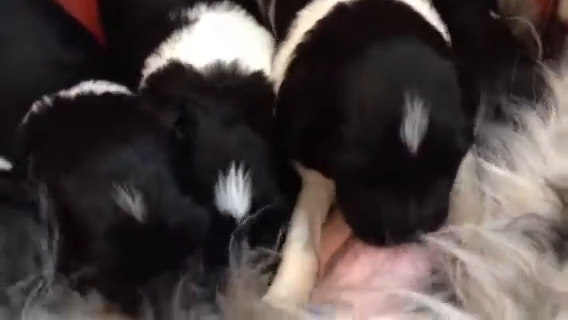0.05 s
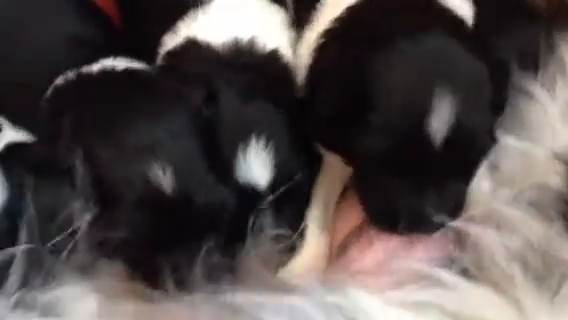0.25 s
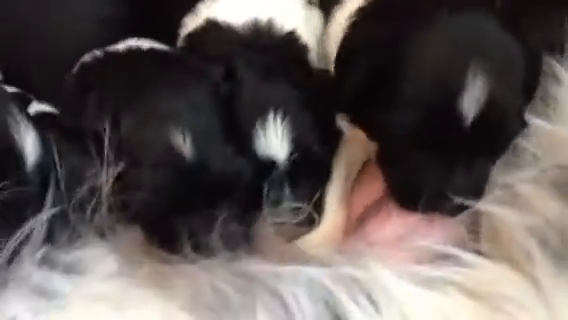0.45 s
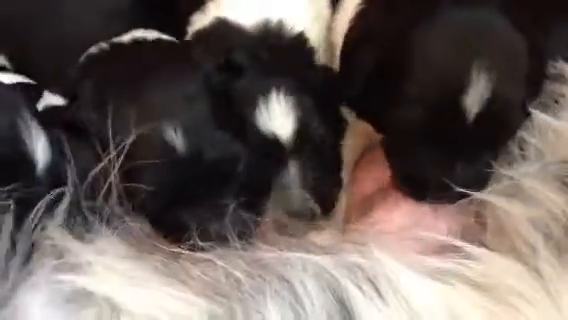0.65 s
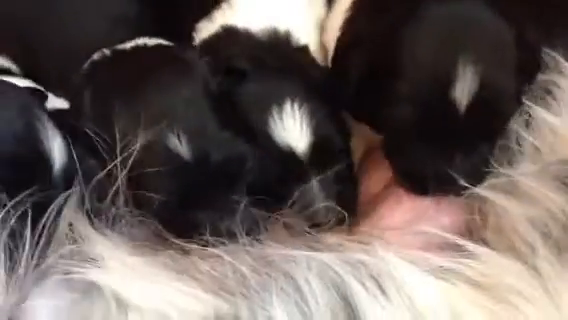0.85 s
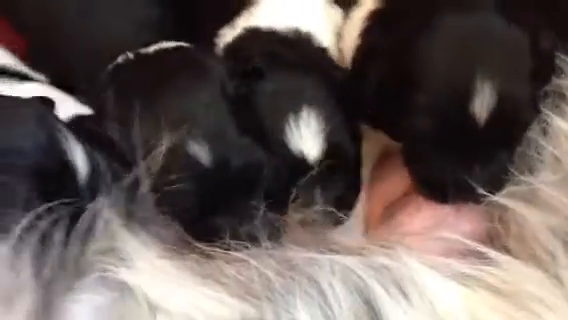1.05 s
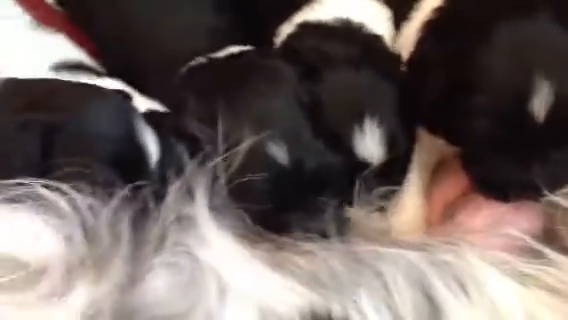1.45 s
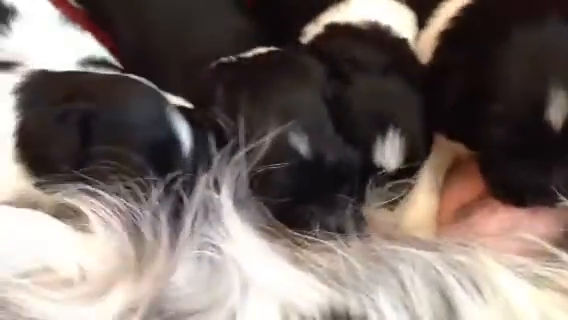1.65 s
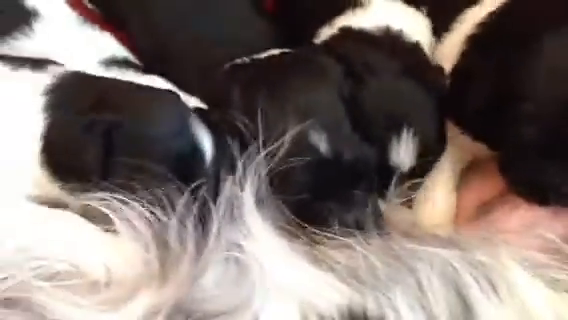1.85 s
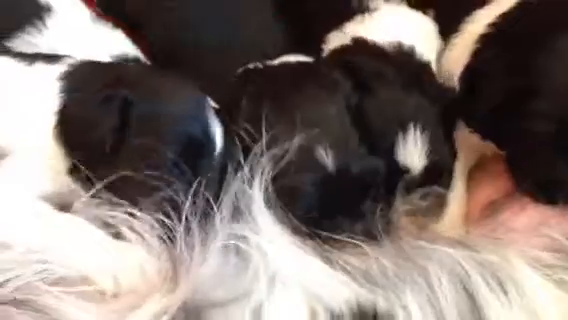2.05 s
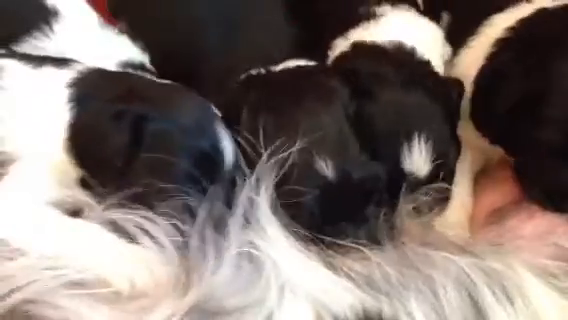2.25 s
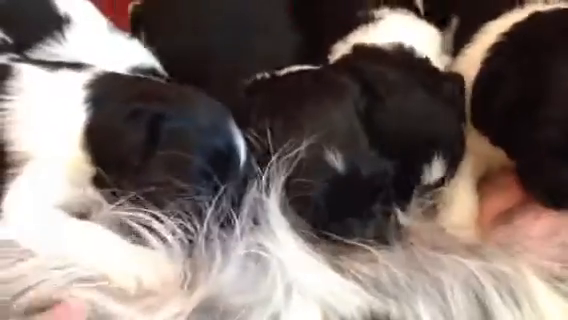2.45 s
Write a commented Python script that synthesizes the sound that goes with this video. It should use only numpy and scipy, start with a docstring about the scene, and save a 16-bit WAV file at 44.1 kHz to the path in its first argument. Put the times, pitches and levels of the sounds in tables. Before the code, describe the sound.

Nursing puppies give a sharp lip smack, then click softly as they nuzzle through fur.

```python
"""A quiet, furnished room, one microphone close to puppies nursing at their mother's belly.
Muzzles and paws push through fur, so hairs slip over each other and skin is rubbed.
One mouth loses its seal with a sharp smack, and a short, bright room reflection follows it.
In between, tongues click as films of milk part, among soft low thuds and a gulp."""
import sys
import numpy as np
from scipy import signal
from scipy.fft import rfft, irfft, next_fast_len
from scipy.io import wavfile
from scipy.ndimage import uniform_filter1d

SR = 44100
rng = np.random.default_rng(int(sys.argv[2]) if len(sys.argv) > 2 else 0)


def generate_wav(sig):
    """Save sig (samples, or channels by samples) to the path in sys.argv[1] as 16-bit PCM at SR."""
    pcm = np.round(np.clip(np.atleast_2d(sig).T, -1, 1) * 32767).astype(np.int16)
    wavfile.write(sys.argv[1], SR, pcm)


N = 110250


def undb(db):
    """Decibels to gain."""
    return 10 ** (np.asarray(db) / 20)


def unit(x):
    """Scale to rms 1."""
    return x / np.sqrt(np.mean(x ** 2) + 1e-20)


def colour(x, points):
    """Filter by a spectrum of (freq_hz, level_db) points."""
    hz, db = np.array(points, float).T
    freqs = np.fft.rfftfreq(len(x), 1 / SR) + 1
    return irfft(rfft(x) * undb(np.interp(np.log(freqs), np.log(hz), db)), len(x))


def add(track, start_s, sound):
    """Mix a sound into a track."""
    i = int(np.clip(start_s * SR, 0, N - 1))
    track[i:i + len(sound)] += sound[:N - i]


def swell(t, length, attack, release):
    """Smooth attack, hold and release."""
    rise = np.sin(np.pi / 2 * np.clip(t / attack, 0, 1))
    return rise * np.sin(np.pi / 2 * np.clip((length - t) / release, 0, 1))


def ring(t, hz, t60):
    """One dying mode."""
    return np.sin(2 * np.pi * hz * t) * np.exp(-np.log(1000) * t / t60)


def grains(per_s, spread_db):
    """Dense tiny impulses of unequal size."""
    impulses = (rng.random(N) < per_s / SR) * np.sign(rng.standard_normal(N))
    return impulses * undb(spread_db * np.minimum(rng.exponential(size=N), 2 * np.pi))


# Spectra of slipping hairs, hair tips and rubbed skin: freq_hz, level_db
HAIR_HISS = [(1200, -15), (2100, -4.5), (3800, 0), (6300, 1), (8000, -5.5), (15000, -36)]
TIP_SIZZLE = [(3500, -50), (6500, -10), (9700, 1), (12000, -4.5), (14000, -1), (16000, -9)]
SKIN_RUB = [(80, -43), (200, -12), (450, -1.5), (700, 0.5), (1200, -3), (1800, 1), (2500, -5.5),
            (4000, -22.5), (9000, -42)]
# Pushes through fur, close to the microphone: start_s, length_s, hiss_db, sizzle_db, rub_db, centre_hz
FUR_PUSHES = [(-.02, 0.082, -65.5, -74, -63.5, 5000), (0.121, 0.17, -67, -62, -72.5, 3280),
              (0.286, 0.15, -66, -70.5, -67, 4340), (0.452, 0.075, -59.5, -60.5, -65, 4000),
              (0.529, 0.098, -59, -59.5, -62, 5440), (0.627, 0.061, -57.5, -60.5, -62, 3670),
              (0.81, 0.069, -58, -60.5, -62.5, 3600), (.9, 0.062, -67.5, -76, -70.5, 5500),
              (0.998, 0.046, -56.5, -60.5, -66.5, 3600), (1.095, 0.063, -64, -63, -74.5, 6460),
              (1.178, 0.045, -58, -63, -63.5, 3760), (1.235, 0.08, -70.5, -70.5, -71.5, 3600),
              (1.347, 0.045, -63, -61, -59.5, 790), (1.393, 0.086, -67.5, -66, -74.5, 2380),
              (1.537, 0.025, -56.5, -58, -50, 1080), (1.555, .018, -53, -55, -57, 6000),
              (1.59, 0.033, -63.5, -64.5, -65, 615), (1.623, 0.073, -63.5, -74, -75, 3800),
              (1.731, 0.037, -62, -62, -59.5, 960), (1.789, 0.11, -64, -61.5, -66, 6300),
              (1.917, 0.051, -56.5, -58, -59, 6040), (2.102, 0.044, -57.5, -61, -62.5, 2340),
              (2.154, 0.18, -66, -66.5, -69, 5650), (2.293, 0.071, -56.5, -57.5, -56, 2750),
              (2.37, 0.076, -66.5, -70, -75.5, 4140)]


def fur():
    """Each push sets hairs slipping over each other and drags a muzzle over the skin."""
    hairs = colour(grains(per_s=14000, spread_db=2.5), HAIR_HISS)
    tips = unit(colour(grains(per_s=14000, spread_db=2.5), TIP_SIZZLE))
    skin = colour(grains(per_s=4000, spread_db=1.5), SKIN_RUB)
    out, t = np.zeros(N), np.arange(N) / SR
    for start, length, hiss_db, sizzle_db, rub_db, centre_hz in FUR_PUSHES:
        span = np.flatnonzero(abs(t - start - length / 2) < .2)
        tuft = (span + rng.integers(N)) % N  # every push meets other hairs
        hiss = undb(hiss_db) * muzzle_gap(hairs[tuft], centre_hz)
        sizzle = undb(sizzle_db) * tips[tuft]
        rub = undb(rub_db) * muzzle_gap(skin[tuft], centre_hz)
        out[span] += push(t[span] - start, length) * (hiss + sizzle + rub)
    return shifting_tufts(out)


def push(t, length, edge_s=0.019, arch_db=2, stir_s=0.013, settle_s=0.034):
    """A push is firmest in its middle; outer hairs stir before it and spring back after it."""
    edges = swell(t + edge_s / 2, length + edge_s, edge_s, edge_s) ** 2
    arch = undb(arch_db * (np.sin(np.pi * np.clip(t / length, 0, 1)) - 1))
    outer_hairs = undb(-8) * np.exp(np.minimum(t, 0) / stir_s - np.maximum(t - length, 0) / settle_s)
    return np.maximum(edges * arch, outer_hairs)


def muzzle_gap(x, centre_hz, lift_db=5, width_octaves=0.33):
    """The gap between muzzle and belly resonates and lifts a broad band of the rustle."""
    size = next_fast_len(len(x))
    octaves = np.log2((np.fft.rfftfreq(size, 1 / SR) + 1) / centre_hz)
    resonance = undb(lift_db * np.exp(-(octaves / width_octaves) ** 2))
    return unit(irfft(rfft(x, size) * resonance, size)[:len(x)])


def wander(per_s):
    """A curve that glides between random values."""
    size = int(SR / per_s)
    steps = np.repeat(rng.standard_normal(256), size)[:N]
    return 0.81 * uniform_filter1d(steps, size)


def shifting_tufts(x, count=22, top_hz=15400):
    """As other tufts are touched, narrow bands each swell and fade a little on their own."""
    band_index = np.interp(np.sqrt(np.fft.rfftfreq(N, 1 / SR)), [0, np.sqrt(top_hz)], [0, count - 1])
    spectrum = rfft(x)
    bands = (irfft(spectrum * np.maximum(1 - abs(band_index - k), 0), N) for k in range(count))
    return sum(band * undb(4 * wander(per_s=26)) for band in bands)


# Modes of the open mouth: pitch_ratio, level_db, t60_s
MOUTH_MODES = [(.85, -14, 0.04), (1, 7, 0.0077), (1.2, -12, 0.017), (1.48, -2.5, 0.0078),
               (2.08, -5, 0.0068), (2.58, -2.5, 0.0074), (4.25, -7, 0.0029)]
# A mouth's seal letting go, close up: start_s, level_db, tilt_db_per_octave, crack_relative_db, pitch_hz
SEAL_SNAPS = [(0.0786, -39, -4.5, -4, 2520), (0.083, -42.5, -6, -13, 2200), (0.2226, -37, -3, -4, 2730),
              (0.2314, -26, -2.5, -1.5, 3020), (0.2374, -14, 1.5, -12, 2525), (0.2401, -32, -17, -19, 2390),
              (0.2418, -25, -8, -27, 2420)]


def smack(rise_s=0.00028, crack_s=0.00098, low_hz=1950):
    """Each snap of the seal cracks and rings the mouth; the narrow lips radiate little of the low ring."""
    out, t = np.zeros(N), np.arange(SR // 20) / SR
    lips = signal.butter(2, low_hz, "high", fs=SR, output="sos")
    rise = (1 - np.exp(-t / rise_s)) ** 2
    for start, level_db, tilt, crack_db, pitch_hz in SEAL_SNAPS:
        modes = sum(undb(mode_db + tilt * max(np.log2(ratio), 0)) * ring(t, ratio * pitch_hz, t60)
                    for ratio, mode_db, t60 in MOUTH_MODES)
        crack = undb(crack_db) * rng.standard_normal(len(t)) * np.exp(-t / crack_s)
        add(out, start, undb(level_db) * (signal.sosfilt(lips, modes * rise) + crack * rise))
    return out


# Spectrum of the room reflection behind the smack: freq_hz, level_db
SMACK_TAIL = [(1500, -12.5), (2100, 1), (2800, 3.5), (4200, -0.5), (6400, -1), (8500, -37)]


def smack_reflections(start_s=.238, level_db=-43.5, t60_s=0.17):
    """A short, bright, grainy room reflection dies away behind the smack."""
    t = np.arange(N) / SR - start_s
    fade = (t > 0) * np.exp(-np.log(1000) * abs(t) / t60_s)
    return undb(level_db) * fade * unit(colour(grains(per_s=4100, spread_db=1.5), SMACK_TAIL))


# Modes of the cavity at the tongue: pitch_ratio, level_db, t60_cycles
TONGUE_MODES = [(1.002, -5.5, 17.4), (1.45, 0.5, 5.9), (2.4, -8, 29)]
# Wet tongue clicks, close up: start_s, level_db, pitch_hz
TONGUE_CLICKS = [(0.0995, -44, 970), (.170, -41, 3180), (0.3463, -41.5, 1230), (.544, -45.5, 870),
                 (0.7905, -36, 1435), (.9908, -35.5, 820), (0.9939, -37, 990), (1.123, -47, 775),
                 (1.178, -41.5, 1040), (1.338, -38, 3600), (1.3775, -42, 700), (1.5232, -37, 4370),
                 (1.5315, -41.5, 1090), (1.5446, -33, 1300), (1.5478, -34.5, 774), (1.5603, -35, 814),
                 (1.799, -48, 1030), (1.923, -43.5, 1160), (2.253, -43.5, 760), (2.293, -39.5, 780),
                 (2.394, -39, 3860)]


def tongues(scatter=.03, wet_db=-12, wet_s=0.0004, band_hz=(410, 8700)):
    """A film of milk parts and rings a cavity too small to radiate bass; lips and fur muffle the top."""
    out, t = np.zeros(N), np.arange(SR // 40) / SR
    band = signal.butter(2, band_hz, "band", fs=SR, output="sos")
    for start, level_db, pitch_hz in TONGUE_CLICKS:
        modes = np.zeros(len(t))
        for ratio, mode_db, cycles in TONGUE_MODES:
            mode_hz = pitch_hz * ratio
            detune = 1 + scatter * rng.standard_normal()
            modes += undb(mode_db) * ring(t, mode_hz * detune, cycles / mode_hz)
        wet = undb(wet_db) * rng.standard_normal(len(t)) * np.exp(-t / wet_s)
        rise = 1 - np.exp(-2 * np.pi * pitch_hz * t)
        add(out, start, signal.sosfilt(band, undb(level_db) * (modes + wet) * rise))
    return out


# Soft low thuds and a gulp from the nursing puppies: start_s, length_s, level_db, pitch_hz
LOW_THUDS = [(.05, 0.033, -72, 111), (0.236, 0.0061, -61, 375), (0.516, 0.034, -64, 277),
             (.558, 0.074, -63.5, 310), (0.773, 0.027, -67, 212), (0.824, 0.035, -57, 341),
             (0.999, 0.062, -71, 240), (1.052, 0.037, -67.5, 270), (1.274, 0.013, -66, 212),
             (1.372, 0.024, -62.5, 390), (1.58, 0.028, -54.5, 250), (1.697, 0.026, -70.5, 146),
             (1.945, 0.031, -62, 407), (2.123, 0.025, -55.5, 176), (2.145, 0.035, -61, 293),
             (2.191, 0.023, -62.5, 270), (2.248, 0.047, -56, 250)]


def low_thuds(attack_s=0.011, relative_width=0.62):
    """Each thud or gulp is a brief swell of one low, well damped body resonance."""
    out, t = np.zeros(N), np.arange(SR // 2) / SR
    freqs = np.fft.rfftfreq(len(t), 1 / SR) + 1
    for start, length, level_db, pitch_hz in LOW_THUDS:
        body = 1 / (1 + 1j * (freqs / pitch_hz - pitch_hz / freqs) / relative_width) ** 2
        rumble = irfft(rfft(rng.standard_normal(len(t))) * body, len(t))
        thud = rumble * swell(t, length, attack_s, release=0.92 * length)
        add(out, start, undb(level_db) * unit(thud[:int(length * SR) + 1]))
    return out


# Spectrum of the room's reflections: freq_hz, level_db
ROOM_TAIL = [(200, -6.5), (1500, 10.5), (2500, 0), (6500, -4.5), (12000, -19)]


def room(x, level_db=-22.5, t60_s=0.19, delay_s=0.006):
    """The furnished room adds a faint, short tail to the close sound."""
    t = np.arange(SR // 2) / SR
    reflections = unit(colour(rng.standard_normal(len(t)), ROOM_TAIL))
    tail = reflections * np.exp(-np.log(1000) * t / t60_s) * (t > delay_s)
    return x + undb(level_db) * signal.fftconvolve(x, tail / np.sqrt(np.sum(tail ** 2)))[:N]


# Spectrum of the room tone at the microphone: freq_hz, level_db
ROOM_TONE = [(25, -25), (60, -31), (130, -7), (250, -2.5), (600, -5), (1400, -9.5), (3000, -8), (6000, -9),
             (10000, -12), (15000, -14)]


def room_tone(level_db=-64.5):
    """Still air and microphone hiss lie steadily under everything."""
    return undb(level_db) * unit(colour(rng.standard_normal(N), ROOM_TONE))


def scene():
    """The litter in the room from one close position, the same in both channels."""
    mono = room(fur() + smack() + smack_reflections() + tongues() + low_thuds()) + room_tone()
    return np.array([mono, mono])


def record(dry):
    """The microphone thins the bass below 55 Hz and cuts the top above 15400 Hz."""
    low_cut = signal.butter(2, 55, "high", fs=SR, output="sos")
    high_cut = signal.ellip(10, .2, 70, 15400, fs=SR, output="sos")
    return signal.sosfilt(high_cut, signal.sosfilt(low_cut, dry))


dry = scene()
out = record(dry)
generate_wav(out)
```